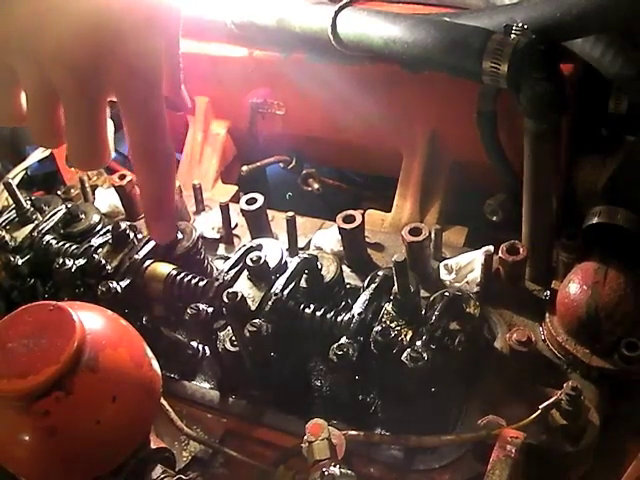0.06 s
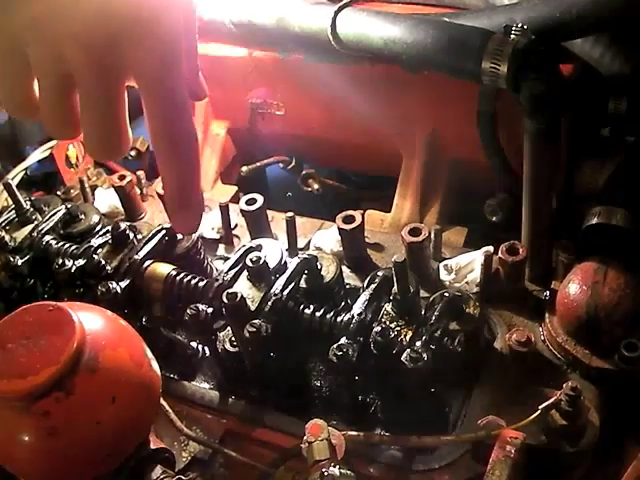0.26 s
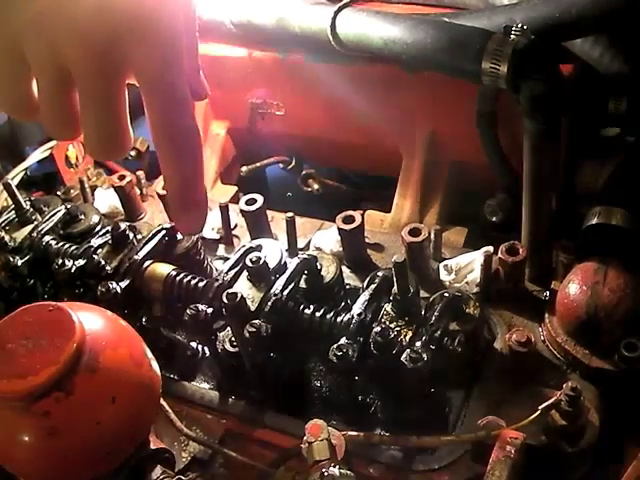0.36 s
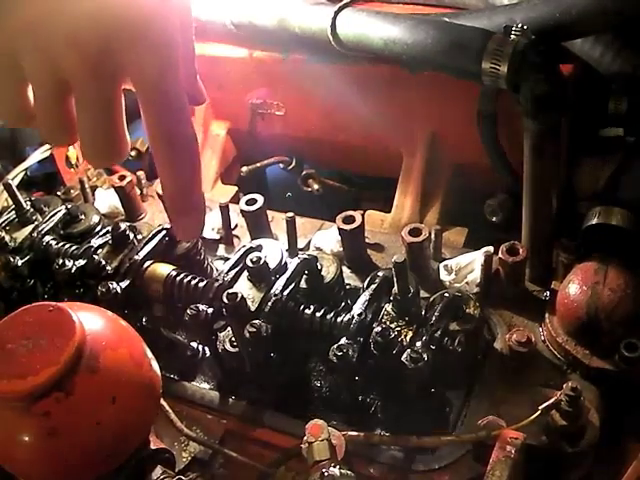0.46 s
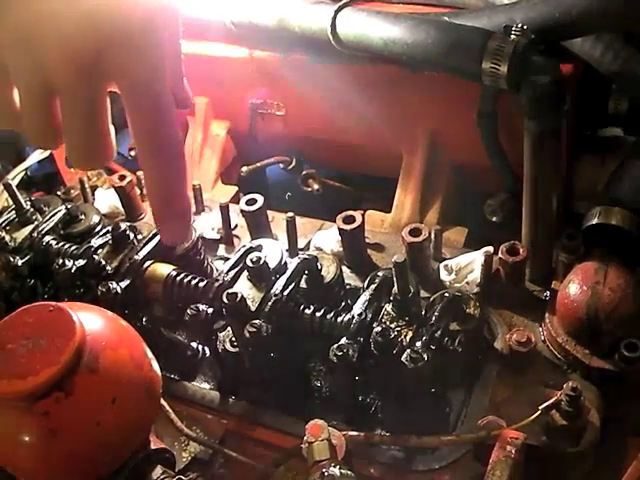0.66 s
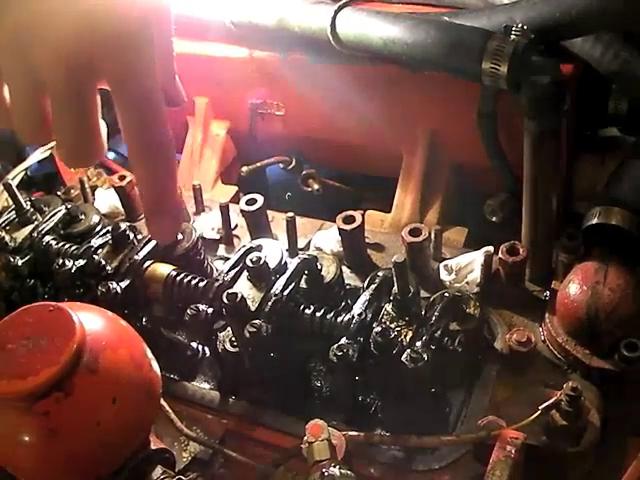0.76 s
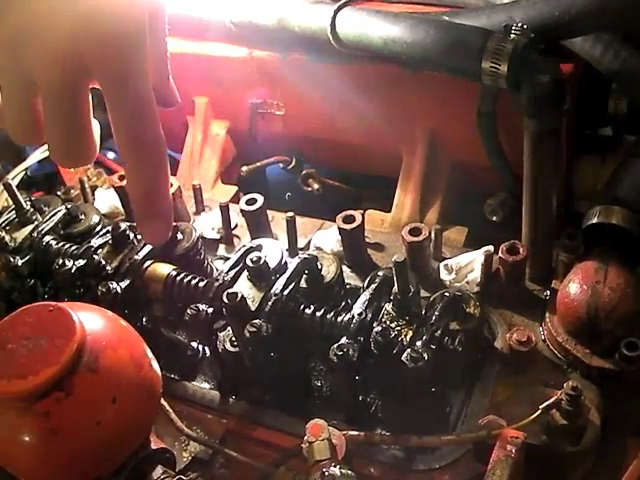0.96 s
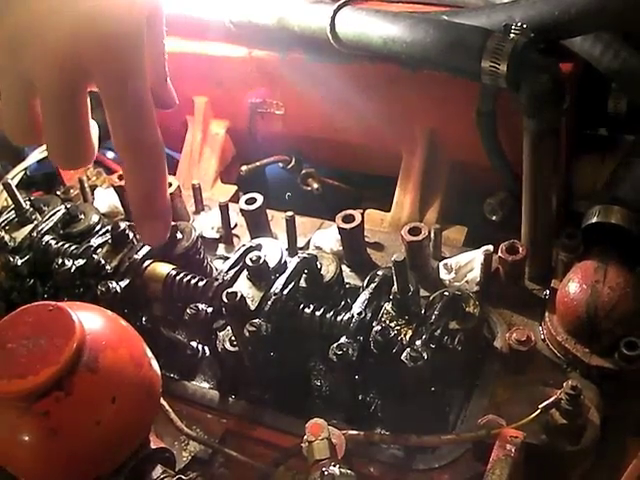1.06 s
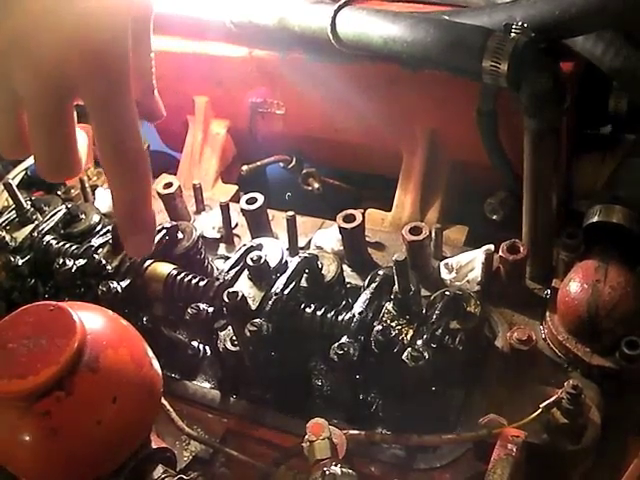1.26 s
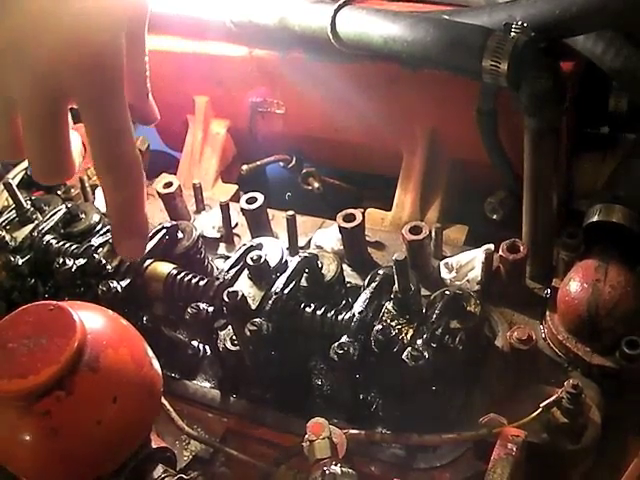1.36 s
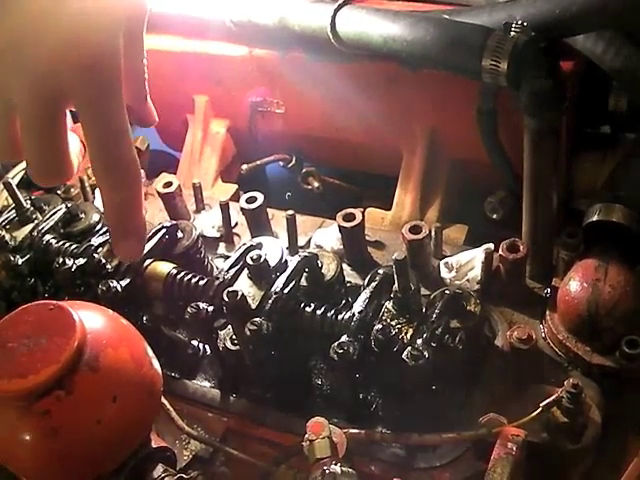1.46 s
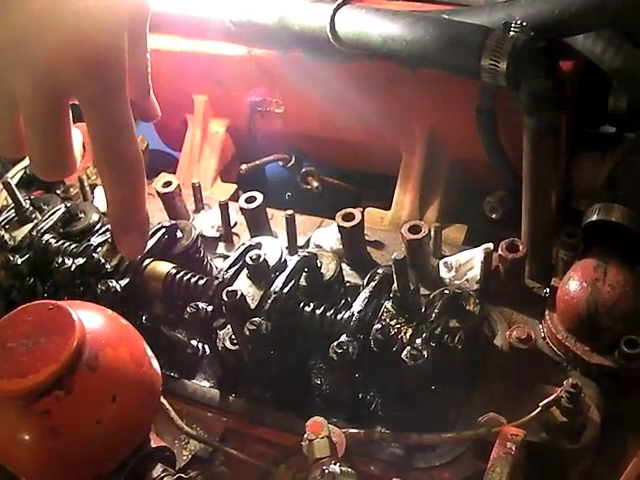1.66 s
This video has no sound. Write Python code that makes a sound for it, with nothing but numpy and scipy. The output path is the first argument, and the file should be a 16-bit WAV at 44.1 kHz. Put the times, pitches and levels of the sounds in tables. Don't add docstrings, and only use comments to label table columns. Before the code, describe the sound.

Steel rocker arms rocked by a finger: a clack, two bright ticks, then another tick and clacking rattle, all within half a second; afterwards faint rattles and oily rubbing, close microphone, small engine space, low hum and hiss.

```python
import sys
import numpy as np
from scipy import signal
from scipy.fft import rfft, irfft, next_fast_len
from scipy.io import wavfile
from scipy.ndimage import uniform_filter1d, map_coordinates

SR = 44100
rng = np.random.default_rng(int(sys.argv[2]) if len(sys.argv) > 2 else 0)


def dump_mix(stems):
    frames = np.atleast_2d(stems).T
    limited = np.clip(frames, -1, 1)
    pcm = np.round(limited * 32767).astype(np.int16)
    wavfile.write(sys.argv[1], SR, pcm)


def voltage_ratio(decibels):
    exponent = np.asarray(decibels, float) / 20
    return 10 ** exponent


N = 74970

# pitch_hz, likeness
ROOM_ALIKE = [(60, 0.87), (240, 0.84), (950, 0.77), (3770, 0.27), (15000, 0.037)]
# pitch_hz, likeness
NEAR_ALIKE = [(300, .95), (2000, .9), (5000, 0.17), (9000, 1), (15000, 0.96)]


def unit(x):
    return x / np.sqrt(np.mean(x ** 2) + 1e-20)


def along(points, hz):
    point_hz, value = np.transpose(points)
    return np.interp(np.log(hz + 1), np.log(point_hz + 1), value)


def filtered(x, response):
    n = x.shape[-1]
    padded = next_fast_len(n + 4096)
    spectrum = rfft(x, padded) * response(np.fft.rfftfreq(padded, 1 / SR))
    return irfft(spectrum, padded)[..., :n]


def noise(gain, size=N, alike=ROOM_ALIKE):
    def mid_side(hz):
        turn = np.arccos(np.clip(along(alike, hz), -1, 1)) / 2
        return gain(hz) * [np.cos(turn), np.sin(turn)]

    mid, side = filtered(rng.standard_normal((2, size)), mid_side)
    return unit(np.array([mid + side, mid - side]))


def wobble(rate_hz):
    knots = rng.standard_normal(int(N * rate_hz / SR) + 4)
    return map_coordinates(knots, [np.arange(N) * rate_hz / SR])


def ring(pitches, modes, t):
    split_hz, chatter_hz = 45, 55
    port_phase, level_scatter_db, life_scatter = 0.8, 1.5, 0.12
    hz, db, t60 = np.repeat([pitches, *np.transpose(modes)], 5, axis=1)[:, :, None]
    chance = rng.standard_normal((5, len(hz), 1))
    spread = np.sqrt(hz / 9000)
    phase = 2 * np.pi * (hz + split_hz * spread * chance[0]) * t + 2 * chance[1]
    steps = rng.standard_normal((len(hz), len(t) // 64 + 1)).repeat(64, axis=1)[:, :len(t)]
    phase = phase + 2 * np.pi * np.cumsum(chatter_hz * spread * steps, axis=1) / SR
    lead = port_phase * chance[2] * hz / 9000
    waves = np.array([np.sin(phase + lead), np.sin(phase - lead)])
    return waves, db + level_scatter_db * chance[3], t60 * np.exp(life_scatter * chance[4])


def dying(waves, db, t60, t):
    return (waves * voltage_ratio(db - 60 * t / t60)).sum(1)


def contact(levels_db, seat, t, age):
    # pitch_hz, level_db
    wash = [
        [(2000, -51), (3200, -10), (6500, -2.5), (9500, 8), (12500, 1), (15000, -3)],
        [(1500, -39), (3000, -8.5), (5000, 2.5), (7000, -3), (10000, -2), (15000, -12.5)],
        [(1200, -43), (2100, -9), (2600, -8.5), (3700, 0.5), (4800, -9), (9000, -33.5)],
        [(200, -41), (400, -6.5), (1000, -2.5), (1800, -1.5), (3000, -16), (6000, -28.5)],
    ]
    wash_db = (-23, -13, -9, -9)
    wash_t60 = (0.099, 0.11, 0.11, 0.17)
    crack_db = (-9.5, -8.5, 6, 8)
    crack_t60 = (0.02, 0.017, 0.0072, 0.035)
    rise_s = (0.00039, 0.00053, 0.00054, 0.0099)
    ring_db = -11
    hit = 0
    for i, (pitches, modes) in enumerate(seat):
        fall = voltage_ratio(wash_db[i] - 60 * age / wash_t60[i]) + voltage_ratio(crack_db[i] - 60 * age / crack_t60[i])
        dense = fall * noise(lambda hz: voltage_ratio(along(wash[i], hz)), size=len(t), alike=NEAR_ALIKE)
        clear = voltage_ratio(ring_db) * dying(*ring(pitches, modes, t), age)
        onset = 1 - np.exp(-t / rise_s[i])
        hit = hit + voltage_ratio(levels_db[i]) * onset * (clear + dense)
    return hit


def bay(x):
    # pitch_hz, t60_s
    bay_decay = [(200, 0.16), (1000, 0.071), (4000, 0.19), (10000, 0.11), (15000, 0.12)]
    burst = noise(lambda hz: hz > 0, size=SR // 4, alike=NEAR_ALIKE)
    hz, t, z = signal.stft(burst, SR, nperseg=256)
    tail = signal.istft(z * voltage_ratio(-60 * t / along(bay_decay, hz)[:, None]), SR, nperseg=256)[1]
    return signal.fftconvolve(x, tail / np.linalg.norm(tail[0]), axes=1)[:, :x.shape[1]]


def thinned(x):
    return filtered(x, lambda hz: (1j * hz / (205 + 1j * hz)) ** 3)


def rockers():
    # start_s, stem_db, rod_db, shaft_db, block_db
    hits = [
        (0.2321, -20.5, -18, -22, -26.5),
        (.2348, -23, -10.5, -27, -39),
        (0.298, -31.5, -42, -62, -69),
        (0.3362, -4, -29, -33, -58),
        (0.4196, -2, -28.5, -34, -78),
    ]
    later_hits = [(.5163, -2.5, -24.5, -41, -70.5), (.579, -45, -22, -26, -36.5),
                  (.6067, -17.5, -9, -16, -27), (.6095, -9, -11, -22, -28),
                  (.626, -39.5, -25.5, -35, -28.5), (.635, -38, -23.5, -35.5, -41),
                  (.659, -32, -29, -40, -33), (.663, -49, -30, -31, -39), (.752, -72, -49, -67, -70),
                  (.775, -78, -52, -59, -58.5), (.81, -77, -55, -75, -83), (.837, -75, -45.5, -57.5, -70)]
    rattles = [(0.213, -74, -76, -72, -72), (.314, -41.5, -33.5, -52, -57.5), (0.709, -64, -69, -75, -80.5),
               (.666, -57, -46, -54, -39), (.944, -80.5, -64, -51.5, -53.5), (0.97, -66, -59, -53.5, -64.5),
               (0.989, -71.5, -56, -58, -64), (1.01, -71.5, -55, -54.5, -66), (1.2292, -63, -58, -45, -54),
               (1.241, -68, -54, -46.5, -50), (1.268, -50, -38, -47.5, -45.5),
               (1.394, -69, -63, -58, -43.5), (1.399, -47, -25.5, -40, -58.5), (1.4026, -52, -22, -36, -71),
               (1.409, -49, -44, -54, -50), (1.439, -68.5, -53, -41, -58), (1.447, -62, -52, -61, -50),
               (1.595, -69, -63, -57, -48.5)]
    stem_hz = 3680, 6660, 9050, 9250, 9440, 9578, 9705, 9830, 9930, 10180, 10820, 12270, 14850, 14600
    rod_hz = 3580, 4100, 5190, 5800, 4310, 6710, 6840, 7050, 7200, 9400, 10800, 11000, 11700, 14650
    shaft_hz = (2530, 2750, 3100, 3350, 3600, 4320)
    block_hz = (320, 480, 765, 880, 1055, 1400, 1600, 2000)
    # level_db, t60_s
    stem = [(-25.5, 0.076), (-14, 0.074), (-20.5, 0.13), (-9.5, 0.12), (-3.5, .13), (2, 0.051), (0, 0.068),
            (-14.5, 0.04), (-3.5, 0.087), (-6, .05), (0, 0.015), (-27, .06), (-18.5, .07), (-12, .07)]
    rod = [(-15, 0.07), (-7.5, 0.058), (-6, 0.039), (-18.5, 0.021), (-13, 0.06), (-14.5, 0.024),
           (-1.5, .05), (5, .055), (-1.5, 0.032), (-4, 0.027), (-7.5, 0.056), (-2, 0.036), (-20, 0.042),
           (-20, 0.09)]
    shaft = [(-6, 0.043), (-9, 0.022), (4, 0.017), (-1, 0.012), (-8, 0.024), (-6.5, 0.017)]
    block = [(-14, 0.32), (-22.5, 0.068), (-13.5, 0.3), (-4, 0.1), (7, 0.072), (-11, 0.05), (-15, 0.064),
             (-4, 0.07)]
    later_stem_hz = 3600, 5110, 6700, 7120, 9230, 9450, 9520, 9680, 9900, 10190, 10800, 11180, 14220, 14600
    later_rod_hz = 3760, 3850, 3955, 5130, 5430, 6240, 6545, 6680, 6950, 7135, 9630, 10740, 11620, 14770
    later_block_hz = 480, 600, 770, 900, 1380, 1600, 1850, 2050
    # level_db, t60_s
    later_stem = [(-15.5, 0.047), (-30, 0.04), (-14, .06), (-13.5, 0.044), (-11.5, 0.047), (-3, 0.118),
                  (-6, 0.13), (1.5, 0.024), (-0.5, 0.025), (-2, 0.032), (-6, 0.088), (-8, 0.043),
                  (-23, .08), (-19, 0.088)]
    later_rod = [(-12.5, .06), (-9.5, 0.093), (-13.5, 0.17), (-19, .07), (-21.5, 0.053), (-10.5, 0.079),
                 (3, .045), (-0.5, 0.061), (1.5, .05), (-10.5, 0.086), (-10.5, 0.036), (-6, 0.077),
                 (-14, .07), (-8, 0.055)]
    later_shaft = [(0.5, 0.061), (-1.5, 0.0275), (3.5, 0.031), (2.5, 0.02), (-1, 0.037), (0, 0.059)]
    later_block = [(-6.5, 0.085), (4.5, 0.058), (-1.5, 0.1), (-9, .08), (3, 0.053), (0, 0.084), (-17, 0.14),
                   (-3.5, .07)]

    first = [(stem_hz, stem), (rod_hz, rod), (shaft_hz, shaft), (block_hz, block)]
    later = [(later_stem_hz, later_stem), (later_rod_hz, later_rod),
             (shaft_hz, later_shaft), (later_block_hz, later_block)]
    bay_db = -9
    t = np.arange(SR // 5) / SR
    rattle_age = 0.99 * t
    out = np.zeros((2, N + SR))
    for rows, seat, age, pan_db in ((hits, first, t, -1.2), (later_hits, later, t, 0.45),
                                    (rattles, first, rattle_age, 0.5)):
        pan = voltage_ratio([[pan_db / 2], [-pan_db / 2]])
        for start_s, *levels_db in rows:
            hit = contact(levels_db, seat, t, age)
            out[:, round(start_s * SR):][:, :len(t)] += (hit + voltage_ratio(bay_db) * bay(hit)) * pan
    return thinned(out[:, :N])


def finger():
    # start_s, length_s, dull_db, bright_db
    rubs = [
        (0, 0.054, -57, -86),
        (0.197, 0.038, -57.5, -48),
        (0.362, 0.069, -68, -40),
        (0.513, 0.11, -46.5, -33.5),
        (0.935, 0.12, -64, -58.5),
        (1.11, 0.07, -94, -58),
        (1.193, 0.09, -62, -53.5),
        (1.566, 0.13, -64.5, -54),
    ]
    # pitch_hz, level_db
    dull = [(200, -26), (500, -0.5), (900, 5), (2000, -11.5), (4000, -30)]
    bright = [(1000, -24), (3000, -9), (6000, -1.5), (10000, 0.5), (15000, -13)]
    grain_db = 2.5
    t, out = np.arange(N) / SR, 0
    for column, colour in ((2, dull), (3, bright)):
        swell = 0
        for row in rubs:
            progress = np.clip((t - row[0]) / row[1], 0, 1)
            swell = swell + voltage_ratio(row[column]) * np.sin(np.pi * progress) ** 2
        out = out + swell * voltage_ratio(grain_db * wobble(90)) * noise(lambda hz: voltage_ratio(along(colour, hz)))
    return out


def far_knock():
    # (level_db, t60_s)
    start_s, level_db, pitches, modes = (1.6, -61, (469, 770), [(2, 0.18), (11, 0.11)])
    t = np.arange(SR // 5) / SR
    out = np.zeros((2, N + SR))
    onset = 1 - np.exp(-t / 0.0097)
    thump = voltage_ratio(level_db) * onset * dying(*ring(pitches, modes, t), t)
    out[:, round(start_s * SR):][:, :len(t)] += thump
    return thinned(out[:, :N])


def whistle():
    # time_s, pitch_hz, level_db
    path = [
        (1.31, 1150, -68),
        (1.37, 1200, -66),
        (1.42, 1120, -67),
        (1.445, 1130, -60),
        (1.47, 1185, -62),
        (1.5, 1200, -58),
        (1.56, 1185, -59),
        (1.62, 1240, -63),
    ]
    flutter_hz, flutter, waver_hz = 55, 0.55, 20
    t = np.arange(N) / SR
    s, hz, db = np.transpose(path)
    level = voltage_ratio(np.interp(t, [s[0] - 0.03, *s, s[-1] + 0.019], [-110, *db, -110]))
    beat = 1 + flutter * np.sin(2 * np.pi * flutter_hz * t + 2 * wobble(25))
    beat = beat * voltage_ratio(2.5 * wobble(130))
    pitch = np.interp(t, s, hz) + waver_hz * wobble(70)
    return np.sqrt(2) * level * beat * np.sin(2 * np.pi * np.cumsum(pitch) / SR)


def hum():
    # pitch_hz, width_hz, level_db
    bands = [(89.5, 20, -78), (167.4, 22, -71.5), (333, 78, -70.5), (471.2, 14, -69.5), (637, 55, -69),
             (811, 79, -74), (2000, 63, -77.5)]
    out = 0
    for centre, width, db in bands:
        out = out + voltage_ratio(db) * noise(lambda hz: width ** 2 / ((hz - centre) ** 2 + width ** 2))
    return out


def room_air():
    # pitch_hz, level_db (per Hz)
    air = [(15, -43), (25, -20), (161, 4), (235, -21), (454, -1), (966, -5), (1310, -7), (1960, -10),
           (7000, -11), (9100, -40.5), (15400, -120)]
    return voltage_ratio(-60.5 + 1.2 * wobble(1.3)) * noise(lambda hz: voltage_ratio(along(air, hz)))


def hiss():
    # pitch_hz, level_db
    hiss_colour = [(2000, -29.5), (6000, -6.5), (10000, 3), (13000, 0), (15000, -2)]
    return voltage_ratio(-62.5 + 0.32 * wobble(5.8)) * noise(lambda hz: voltage_ratio(along(hiss_colour, hz)) * (hz > 1000))


def scene():
    return rockers() + finger() + far_knock() + whistle() + hum() + room_air() + hiss()


def gain_control(dry):
    threshold_db, squeeze, release_s = -24, 0.37, 0.027
    ceiling = 0.87
    step = 1 / (release_s * SR)
    power = signal.lfilter([step], [1, step - 1], (dry ** 2).mean(0))
    over_db = np.clip(10 * np.log10(power + 1e-12) - threshold_db, 0, None)
    held = dry * voltage_ratio(-squeeze * over_db)
    return held / (1 + (held / ceiling) ** 4) ** 0.25


def microphone(x):
    notch_hz, notch_wide_hz, notch_db = 8050, 330, -42
    top_hz, top_db = 15050, -35

    def response(hz):
        notch = notch_db * np.exp(-((hz - notch_hz) / notch_wide_hz) ** 4)
        top = top_db * np.clip((hz - top_hz) / 500, 0, 1)
        return voltage_ratio(notch + top) * (hz < 16500)

    return filtered(x, response)


def level_dips(x):
    # start_s, end_s
    dip_s = [
        (.2245, .229),
        (.5005, .5148),
        (.329, .334),
    ]
    dip_db = -25, -13, -8
    dip_over_hz = 1, 1800, 1200
    t = np.arange(N) / SR
    for (start, end), db, edge_hz in zip(dip_s, dip_db, dip_over_hz):
        inside = uniform_filter1d(1.0 * (t > start) * (t < end), size=60)
        x = x - (1 - voltage_ratio(db * inside)) * filtered(x, lambda hz: hz >= edge_hz)
    return x


def roll_off(x):
    return signal.sosfilt(signal.butter(12, 16480, fs=SR, output="sos"), x)


def record(dry):
    heard = level_dips(microphone(gain_control(dry)))
    return roll_off(heard)


dry = scene()
out = record(dry)
dump_mix(out)
```